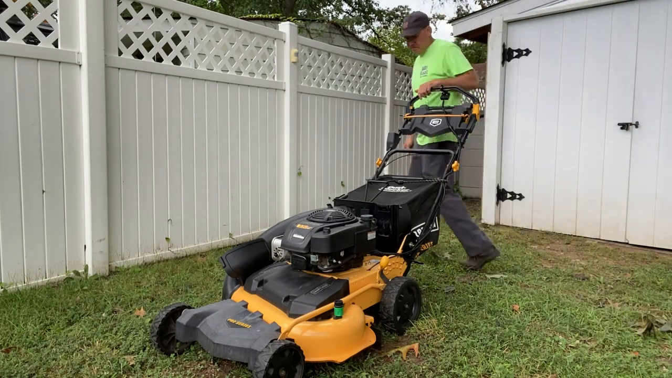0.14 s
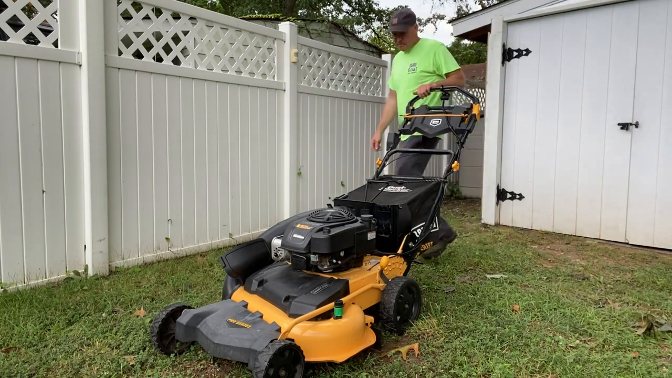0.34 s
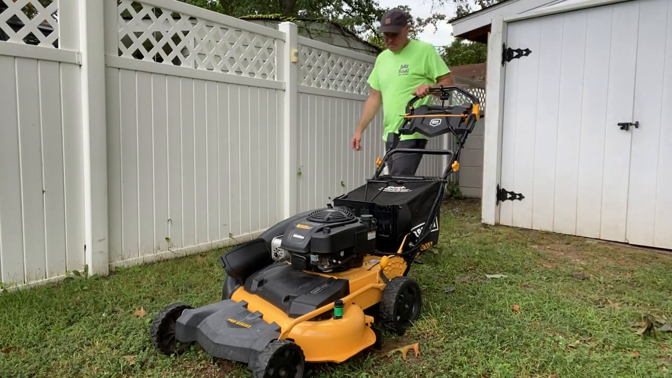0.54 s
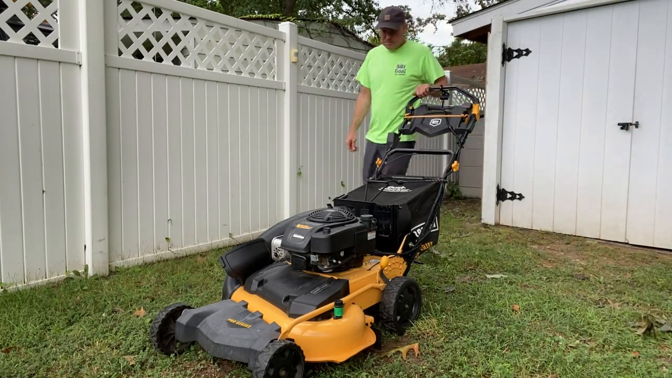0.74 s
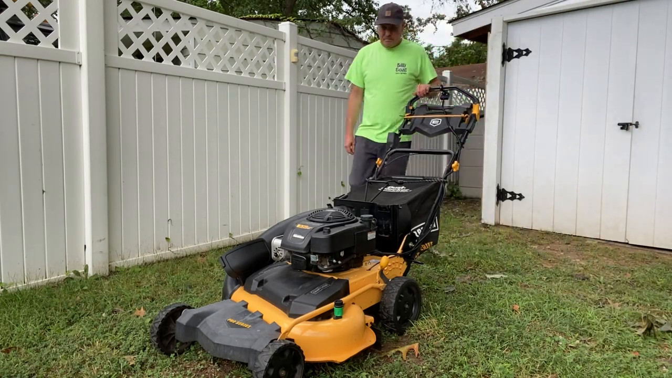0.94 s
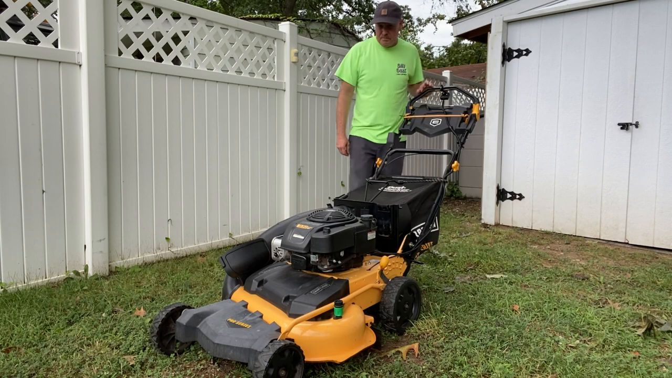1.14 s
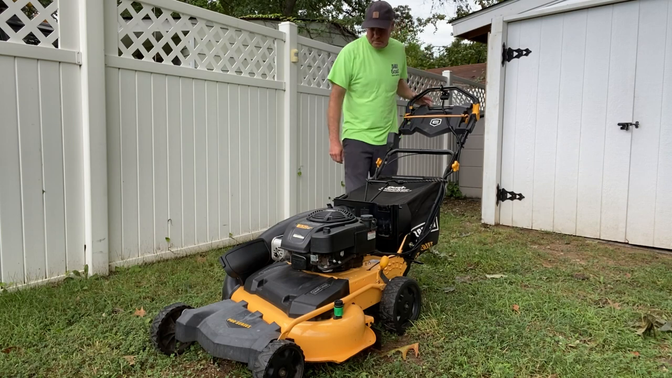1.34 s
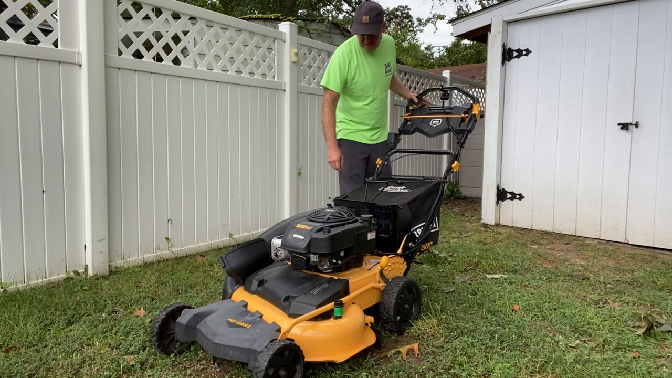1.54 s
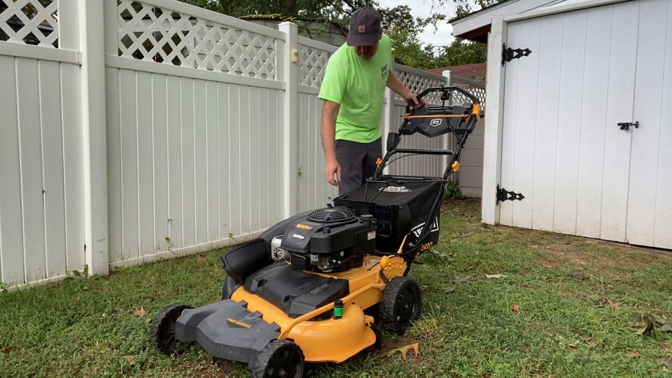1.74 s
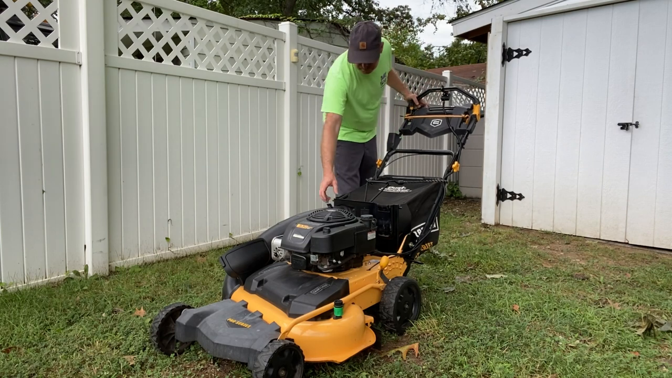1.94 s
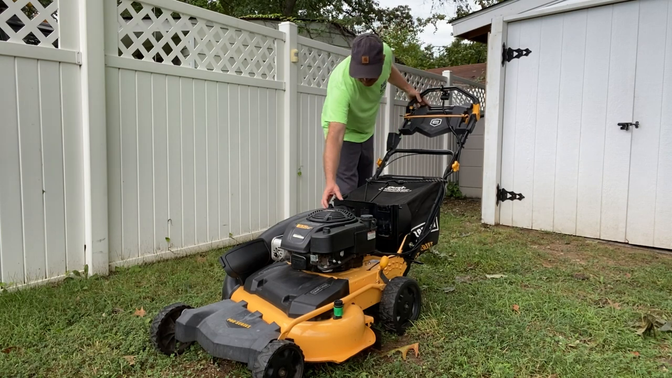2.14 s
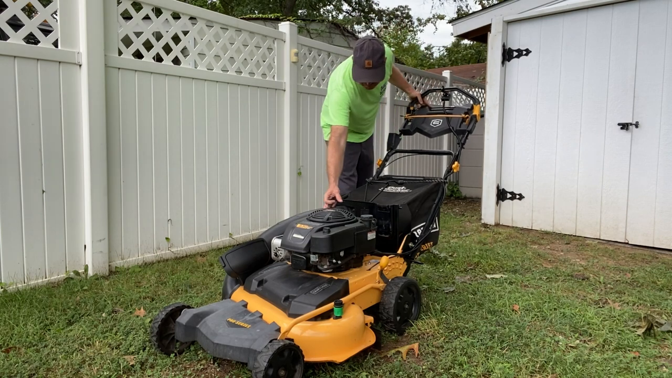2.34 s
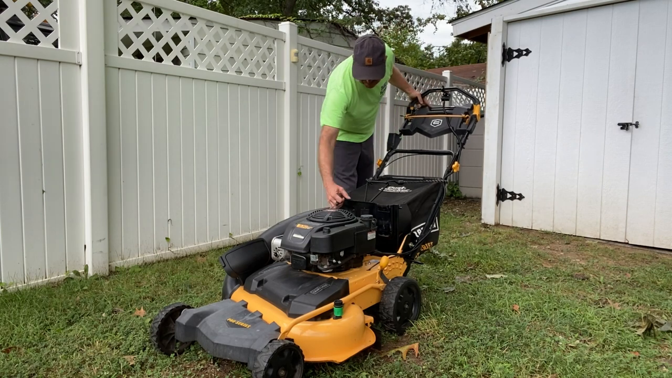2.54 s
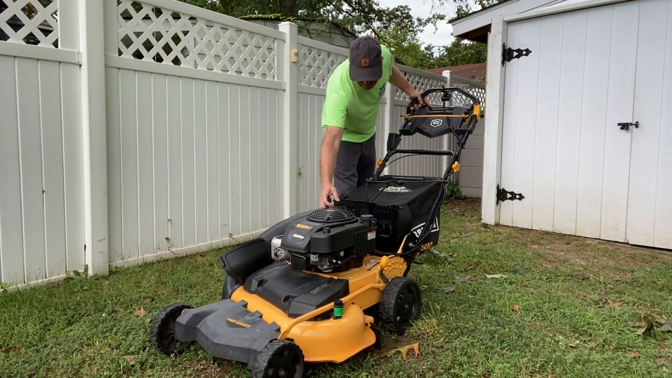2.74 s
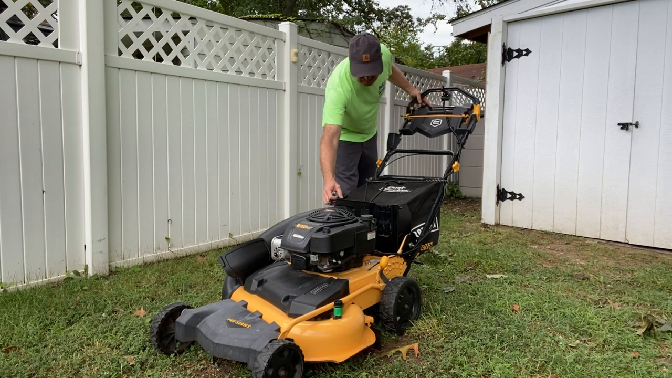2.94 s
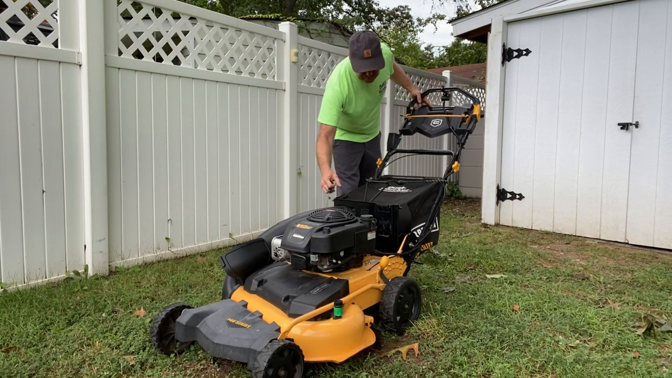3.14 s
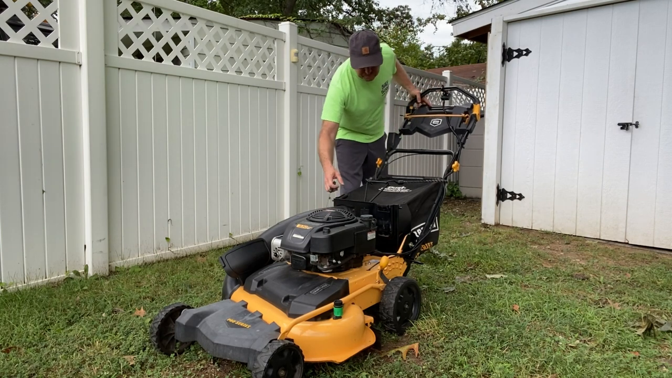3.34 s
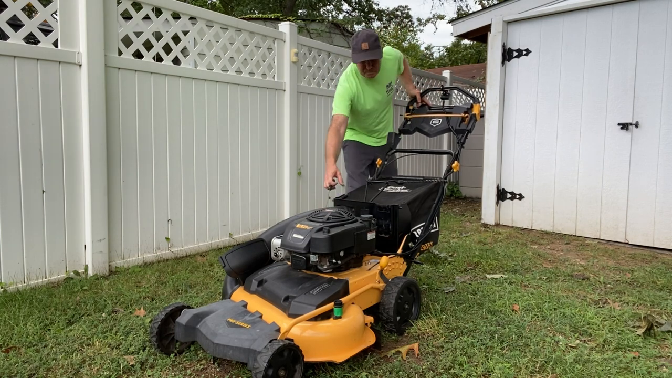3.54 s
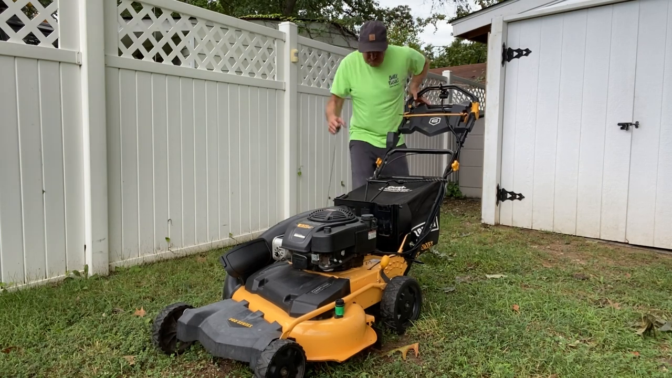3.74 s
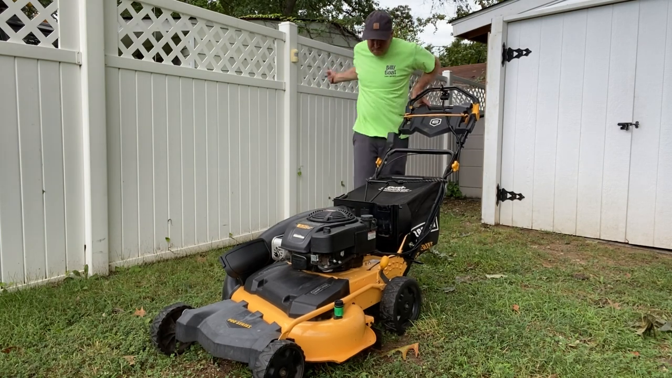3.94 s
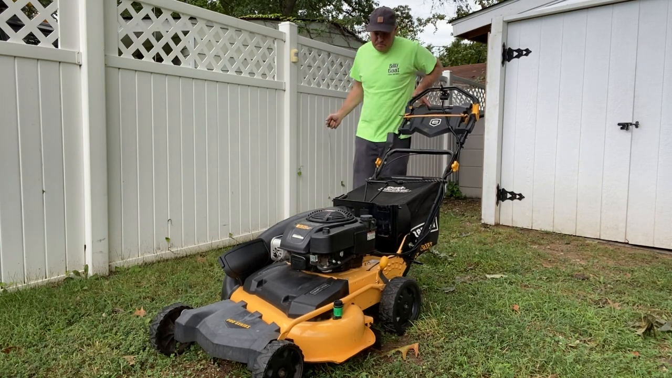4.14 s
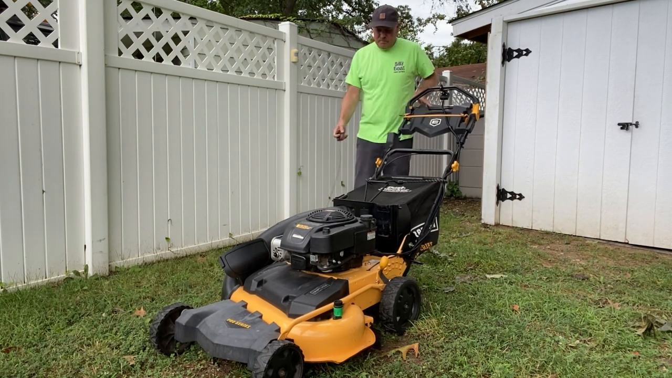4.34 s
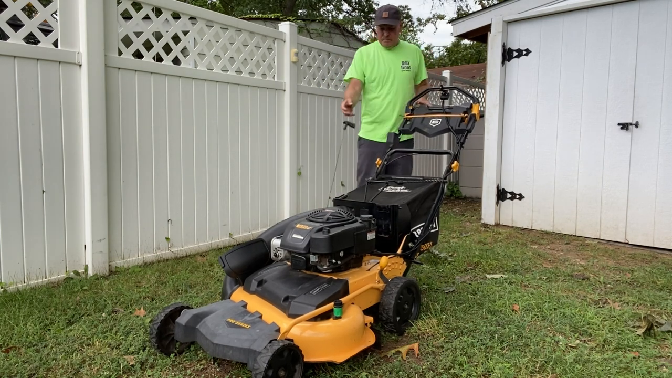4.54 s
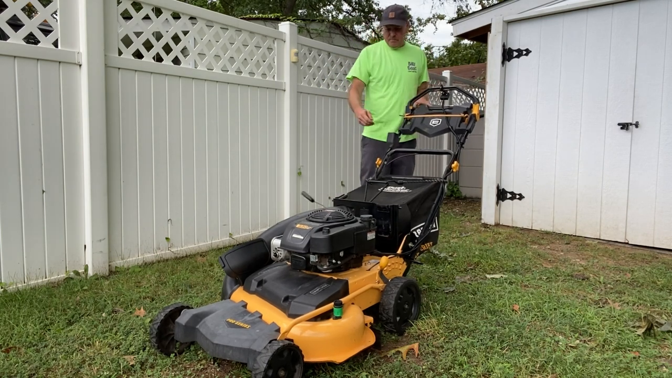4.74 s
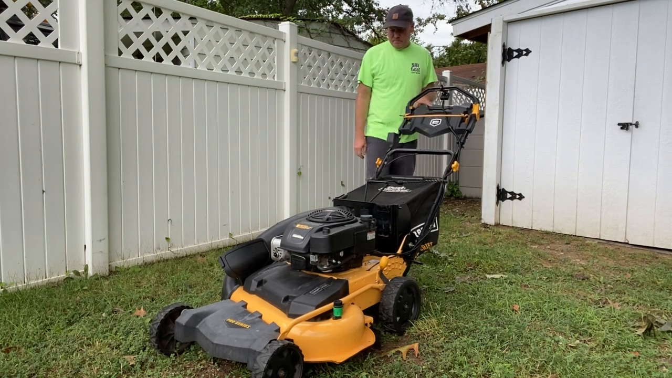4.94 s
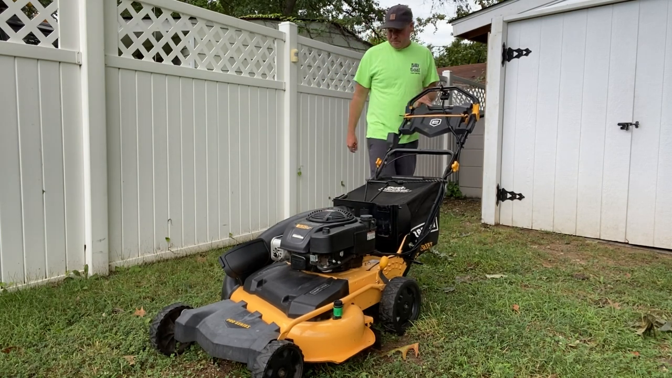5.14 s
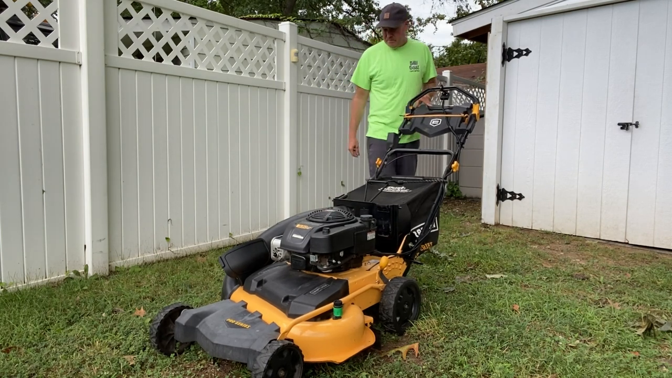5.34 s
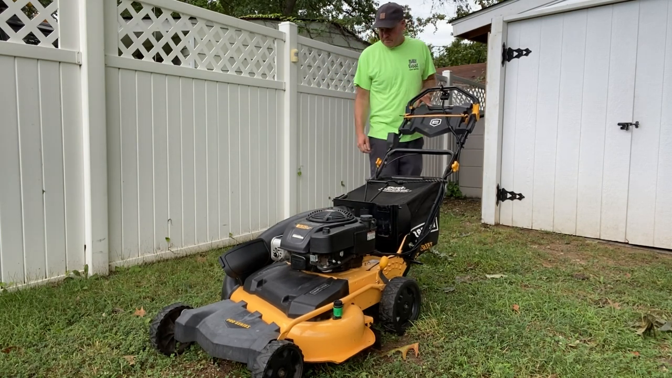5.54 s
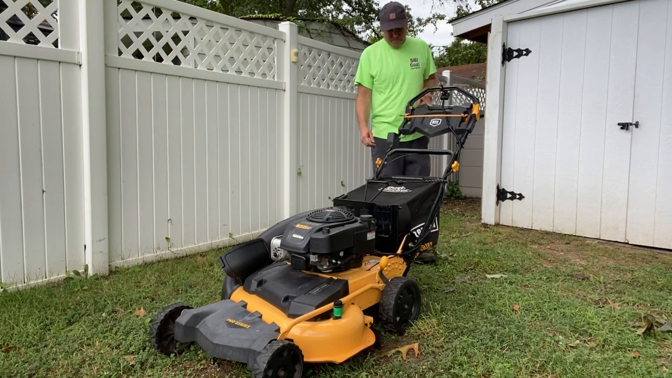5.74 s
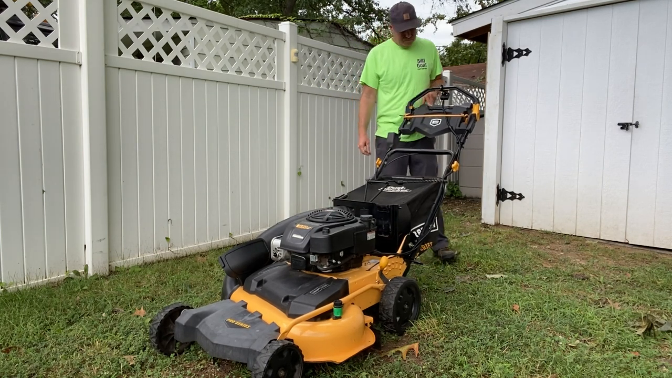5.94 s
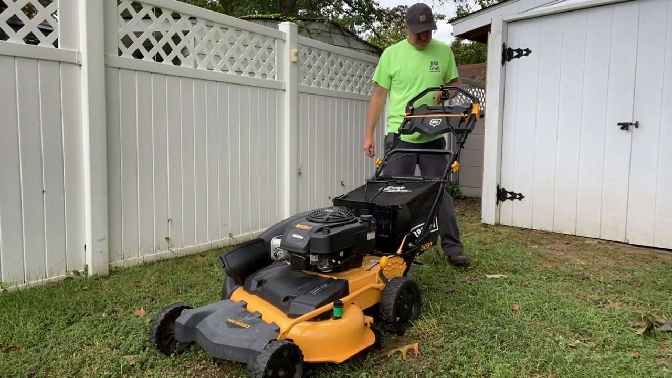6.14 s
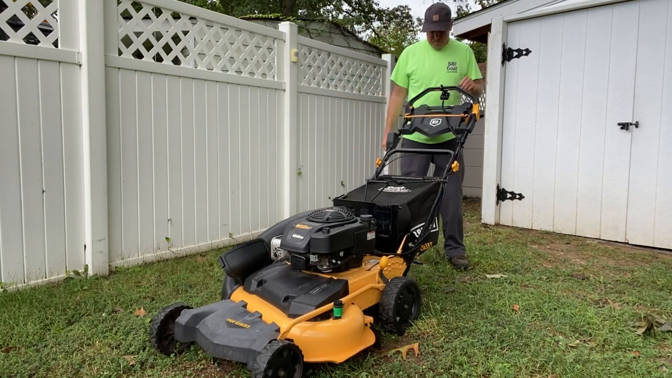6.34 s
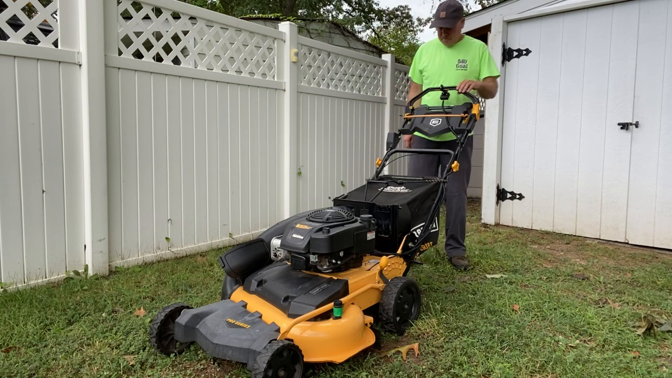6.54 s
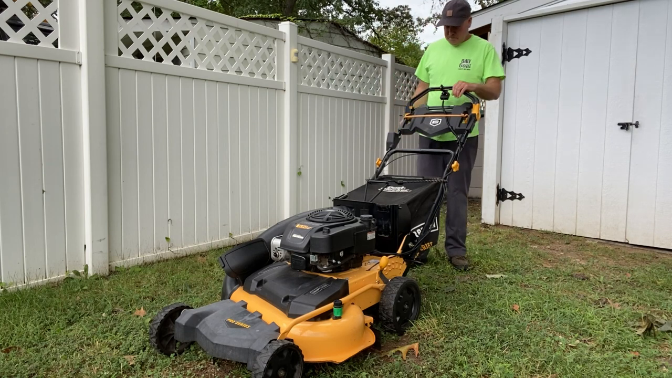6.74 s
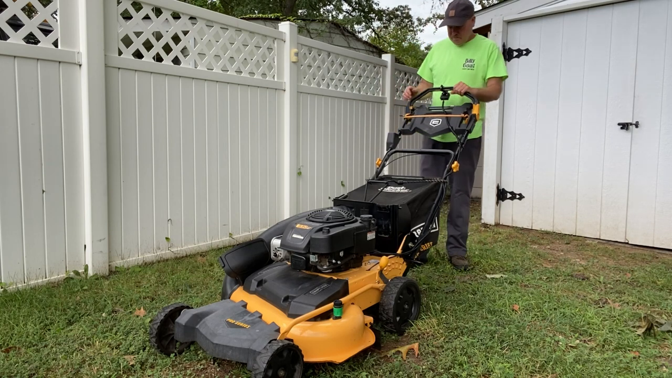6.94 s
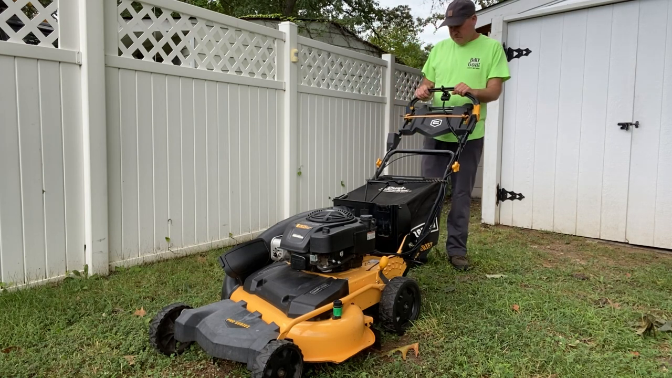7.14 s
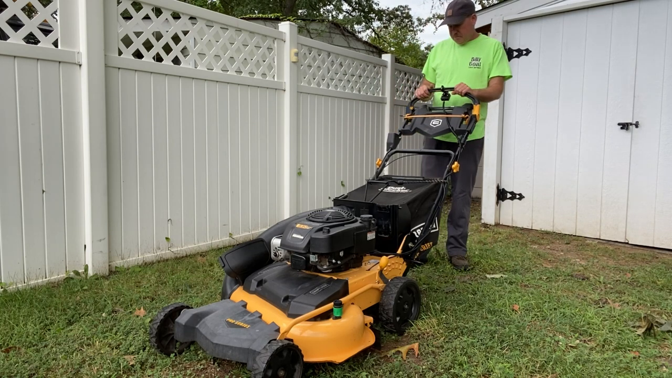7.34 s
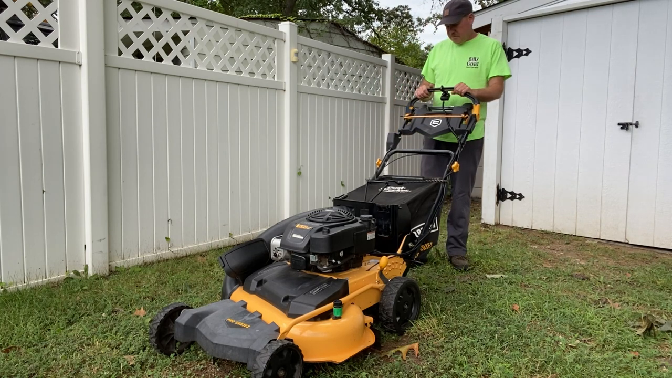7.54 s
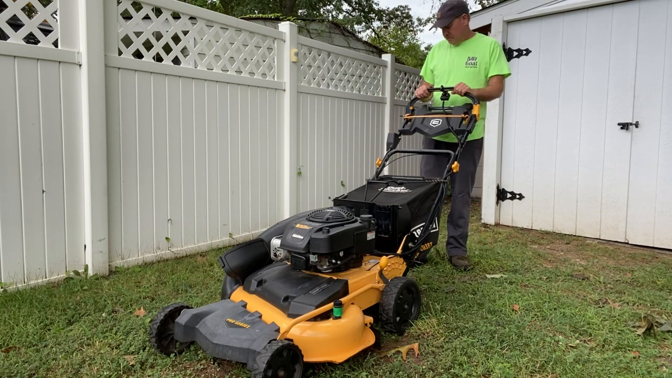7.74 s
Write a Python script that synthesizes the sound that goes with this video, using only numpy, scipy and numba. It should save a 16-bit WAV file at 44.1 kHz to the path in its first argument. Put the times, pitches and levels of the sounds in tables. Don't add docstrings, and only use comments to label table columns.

```python
import sys
import numpy as np
from scipy import signal
from scipy.fft import rfft, irfft
from scipy.io import wavfile
from scipy.ndimage import uniform_filter1d
from numba import njit

SR = 44100
rng = np.random.default_rng(int(sys.argv[2]) if len(sys.argv) > 2 else 0)


def decibels_to_gain(level_db):
    exponent = np.asarray(level_db, float) / 20
    return 10 ** exponent


def log_audio(samples):
    frames = np.atleast_2d(samples).T
    limited = np.clip(frames, -1, 1)
    pcm = np.round(limited * 32767).astype(np.int16)
    wavfile.write(sys.argv[1], SR, pcm)


N = 347508
TIME, FREQ = np.arange(N) / SR, np.maximum(np.arange(N // 2 + 1) * SR / N, 1)


def noise():
    return rng.standard_normal(N)


def curve(table, column=1, at=TIME):
    return np.interp(at, *np.array(table, float).T[[0, column]])


def level(x, db):
    return x * decibels_to_gain(db) / np.sqrt(np.mean(x ** 2))


def unit(x):
    return x / np.abs(x).max()


def delay(x, s):
    return np.roll(x, int(s * SR))


def colour(x, spectrum):
    hz, db = np.transpose(spectrum)
    return irfft(rfft(x, N) * decibels_to_gain(np.interp(np.log(FREQ), np.log(hz), db)), N)


@njit
def svf(x, hz, width):
    y, b, l = np.empty(len(x)), 0., 0.
    for i in range(len(x)):
        g, k = np.tan(np.pi * hz[i] / SR), width / hz[i]
        v = (b + g * (x[i] - l)) / (1 + g * (g + k))
        b, l, y[i] = 2 * v - b, l + 2 * g * v, k * v
    return y


def band(x, hz, width):
    return svf(x + 1e-18, hz * np.ones(N), 1. * width)


def fade(x, s):
    return signal.lfilter([1], [1, -np.exp(-1 / (s * SR))], x)


def walk(rate):
    k = int(SR / rate)
    held = np.repeat(rng.standard_normal(N // k + 1), k)
    return 0.87 * uniform_filter1d(uniform_filter1d(held, k), k)[:N]


# f/Hz, level/dB per Hz
TRAFFIC = [(15, -52), (25, -35), (39, -3.5), (70, 2.5), (96, 1), (119, -4), (252, -14), (332, -19.5),
           (856, -25.5), (2800, -37.5), (3640, -70), (6160, -120)]
# t/s, level/dB
CAR_SWELL = [(0.3, 4), (1.74, 0.5), (2.17, 4.5), (3.0, 3.5), (3.5, -1.5), (3.6, -10)]


def traffic():
    side_over_mid = [(30, -21), (150, -8.5), (300, -5), (600, 2.0), (3000, -0.5)]  # f/Hz, level/dB
    mid, side = (colour(noise(), TRAFFIC) for _ in range(2))
    both = (mid + np.array([[1], [-1]]) * colour(side, side_over_mid)) * decibels_to_gain(1.2 * walk(4.02))
    both = both * decibels_to_gain(-48.5 + np.array([[.7], [-.7]])) / np.std(mid)
    swell = decibels_to_gain(curve(CAR_SWELL) + 0.53 * walk(4.8))
    return both + [band(port, 1200, 1600) * (swell - 1) for port in both]


# f/Hz, width/Hz, level/dB, pulsing/dB
INSECT_CHOIRS = [(3180, 250, -74.5, 3.5), (3450, 580, -73.5, 6), (4230, 480, -76.5, 4.5),
                 (5780, 1260, -61.5, 1.3), (8370, 1470, -68.5, 4.5)]


def insects():
    out = np.zeros((2, N))
    for hz, width, db, pulse_db in INSECT_CHOIRS:
        for port in out:
            port += level(band(band(noise(), hz, width), hz, width), db + 3) * decibels_to_gain(pulse_db * walk(9.03))
    return out


# t/s, level/dB
GRASS_STEP = [
    (.3, -79),
    (.37, -58),
    (.45, -71),
    (.6, -88),
    (.95, -93),
]


def grass_step():
    return level(band(band(noise(), 7700, 2500), 11700, 2500), 0) * decibels_to_gain(curve(GRASS_STEP))


def struck(blows, crack_hz):
    out, t = np.zeros(N + SR), np.arange(SR // 4) / SR
    crack_band = [crack_hz / 2.6, min(crack_hz * 2.0, .45 * SR)]
    crack_filter = signal.butter(2, crack_band, "band", fs=SR)
    for s, db, hz, t60, crack_db in blows:
        rough, sharp = rng.standard_normal((2, len(t)))
        wobble = uniform_filter1d(rough, size=max(int(SR / hz), 8)) * 3.6
        ring = np.sin(2 * np.pi * hz * t + wobble) * (1 - np.exp(-t / 0.002)) * decibels_to_gain(-60 * t / t60)
        crack = signal.lfilter(*crack_filter, sharp) * np.exp(-t / 0.0082)
        out[int(s * SR):int(s * SR) + len(t)] += decibels_to_gain(db) * (ring + decibels_to_gain(crack_db) * crack)
    return out[:N]


# t/s, peak level/dB, f/Hz, t60/s, crack level/dB
HANDLE_TAGS = [
    (.687, -33, 11000, 0.13, -14),
    (0.76, -46, 11700, 0.1, -20),
    (.69, -50, 14000, .08, -16),
    (0.64, -54, 8000, .06, -20),
    (.772, -56, 12700, .06, -18),
]


def tags():
    return colour(struck(HANDLE_TAGS, 11000), [(5000, -30), (7500, -5.5)])


# start t/s, end t/s, start f/Hz, end f/Hz, level/dB
THIN_SQUEAKS = [
    (2.182, 2.383, 3340, 3270, -55),
    (2.36, 2.5, 4700, 4700, -73),
    (2.6, 2.83, 2500, 2500, -50.5),
    (2.626, 2.717, 4100, 4050, -60),
    (3.4, 3.55, 3240, 3270, -64),
    (3.617, 3.71, 900, 2070, -42),
    (3.698, 3.8, 2060, 3450, -42),
    (1.098, 1.75, 3140, 3100, -70),
    (3.644, 3.76, 2950, 5140, -58),
]


def squeaks():
    out = np.zeros(N)
    for start, end, hz, end_hz, db in THIN_SQUEAKS:
        gone = np.clip((TIME - start) / (end - start), 0, 1)
        shake_hz = 7 + .04 * abs(end_hz - hz)
        loudness = np.sin(np.pi * gone) * decibels_to_gain(db + (2.5 + .1 * shake_hz) * walk(60))
        pitch = hz + (end_hz - hz) * gone + shake_hz * walk(70)
        out += loudness * np.sin(2 * np.pi * np.cumsum(pitch) / SR)
    return out


# start t/s, end t/s, level/dB, treble level/dB
HAND_STROKES = [
    (2.187, 2.372, -56, -16),
    (2.51, 2.562, -44.5, -11),
    (2.57, 2.752, -51, 2),
    (2.75, 2.787, -52, -30),
    (2.877, 2.876, -49.5, -26),
    (2.96, 3.075, -48.5, -9),
    (3.095, 3.105, -38.5, -2),
]
# t/s, level/dB, treble level/dB
CORD_PULL = [
    (3.5, -62, 8),
    (3.646, -51, -9),
    (3.72, -37, -5),
    (3.74, -29.5, -29),
    (3.752, -34, -9),
    (3.796, -38.5, 7),
    (3.83, -15.5, -7),
]


def sliding():
    rise_db_s, fall_db_s = 400, 330
    grain = noise() * decibels_to_gain(3.3 * walk(120))
    dull = level(band(grain, 820, 760), -3.5) + level(band(grain, 1510, 110), -13.5)
    bright = level(band(band(grain, 3300, 5600), 2700, 4800), -9.0)
    pulling = (TIME > CORD_PULL[0][0]) * (TIME < CORD_PULL[-1][0])
    out = pulling * decibels_to_gain(curve(CORD_PULL)) * (dull + decibels_to_gain(curve(CORD_PULL, column=2)) * bright)
    for start, end, db, treble_db in HAND_STROKES:
        away_db = rise_db_s * np.maximum(start - TIME, 0) + fall_db_s * np.maximum(TIME - end, 0)
        out += decibels_to_gain(db - away_db) * (dull + decibels_to_gain(treble_db) * bright)
    return out


# t/s, peak level/dB, f/Hz, crack level/dB
GRIP_KNOCKS = [(2.259, -37, 2370, -20), (2.333, -37, 884, -20), (2.51, -50, 1560, -8),
               (2.546, -36, 1550, 2), (2.58, -40, 1580, 4), (2.658, -33, 1110, -6), (2.729, -30, 1700, -17),
               (2.868, -33.5, 828, -18), (2.94, -39.5, 450, -3), (3.007, -31.5, 1570, -9),
               (3.057, -37, 1560, 7.5), (3.083, -33, 1560, 5), (3.091, -22.5, 311, -23),
               (3.553, -35, 3280, -5), (3.583, -41, 950, -2), (3.633, -30, 990, -20),
               (3.673, -32.5, 1005, -2), (3.72, -27, 293, -14), (3.737, -19, 281, -20),
               (3.773, -23, 201, -18), (4.718, -11.5, 720, 4), (4.718, -24, 1530, -29)]
# f/Hz, level/dB, t60/s
COVER_MODES = [(424, -30.5, 0.11), (650, -27.5, 0.11), (900, -12.5, 0.028), (1100, -27, .081),
               (1464, -21.5, 0.05)]


def knocks():
    t60_at_1k, slope = 0.065, 0.61
    blows = [(s, db, hz, t60_at_1k * (1000 / hz) ** slope, crack_db) for s, db, hz, crack_db in GRIP_KNOCKS]
    blows += [(2.765, db, hz, t60, -32) for hz, db, t60 in COVER_MODES]
    return struck(blows, 2800)


def handling():
    plastic = squeaks() + sliding() + knocks()
    return grass_step() + tags() + colour(plastic, [(8000, -2.5), (11000, -5)])


def cyclic(since):
    repeat_share = 0.39
    again = colour(noise()[(since * SR).astype(int)], [(450, -30), (800, 0)])
    return np.sqrt(repeat_share) * again + np.sqrt(1 - repeat_share) * noise()


# f/Hz, level/dB per Hz
WHIRR_COLOUR = [(60, -10), (150, -11), (380, -9.5), (560, -10.5), (1200, -14), (1900, -23), (4000, -28.5),
                (8800, -39), (10500, -51), (13000, -68), (16000, -90)]


def whirr(since, spin):
    return level(colour(cyclic(since), WHIRR_COLOUR), 0) * spin * decibels_to_gain(4.5 + 0.71 * walk(25))


# f/Hz, width/Hz, level/dB
HOUSING_MODES = [(925, 9.5, -6), (1045, 26, 1), (1119, 14.5, 5.5), (1206, 95, 5), (1450, 410, 5.5)]


def covers(clack, spin, since):
    rattle = spin * (0.87 + 3.8 * unit(fade(fade(clack, 0.012), 0.011))) * cyclic(since)
    shake = fade(fade(rattle + 8 * spin * clack, .00008), .00008)
    return sum(decibels_to_gain(db) * band(shake, hz, width) / np.sqrt(width) for hz, width, db in HOUSING_MODES)


# firing number, lateness/ms
GOVERNOR_HUNT = [(5, 0), (7, 3), (10, .6), (16, -2.1), (20, 2.7), (24, 1.4), (32, 4), (36, 2.8), (44, 2.6),
                 (52, 1), (60, 3.3), (68, -1), (72, -.4), (88, -2.8), (100, -.3)]
# t/s, spit level/dB
THROTTLE_LEVEL = [(3.82, -7), (4.0, -9), (4.15, -10.5), (4.22, -10), (4.3, -11.5), (4.75, -14), (4.9, -16),
                  (5.28, -15), (5.4, -18), (5.8, -17.5), (5.95, -21), (6.15, -16.5), (6.5, -21), (7.0, -22),
                  (7.4, -20.5), (7.52, -16.5), (7.68, -21.5), (7.83, -16.5)]
# start t/s, end t/s, share of the burn lost
MISSED = [
    (4.36, 4.43, 1.2),
    (4.435, 4.51, 1.08),
    (4.515, 4.545, 0.67),
    (4.78, 4.81, 0.12),
    (4.93, 4.96, 0.2),
    (4.965, 4.995, 0.25),
    (5.0, 5.03, 0.93),
    (5.825, 5.855, 0.32),
    (7.1, 7.13, 0.05),
    (7.17, 7.2, 0.067),
]


def burn():
    catch_s, cycle_s, runup_lag_s, runup_ratio = 3.8206, .0375, .1434, .66
    warm_s, warm_width_s, miss_chill = 4.2, 0.08, 0.96
    n = np.arange(105)
    fired = catch_s + n * cycle_s + runup_lag_s * (1 - runup_ratio ** n) + curve(GOVERNOR_HUNT, at=n) / 1000
    lost = sum(share * ((fired > start) & (fired < end)) for start, end, share in MISSED)
    throttle_db = curve(THROTTLE_LEVEL, at=fired)
    thump_db = -15.5 + 0.18 * (throttle_db + 18) - 7.5 * lost
    spit_db = throttle_db - 13.5 * lost
    warming = 1 / (1 + np.exp((fired - warm_s) / warm_width_s))
    lingering = 0.1 * signal.lfilter([0, 1], [1, -0.79], lost)
    cold = np.clip(warming + miss_chill * lost + lingering, 0, 1)
    return fired, thump_db, spit_db, cold


# multiple of the cycle, level/dB over whirr, lead/turns
PISTON_PUMP = [(2, 2.5, -0.47), (3, 3, -0.06), (4, -6, 0.55), (14, -10.5, 0.65)]


def pump(fired, spin):
    turns = np.interp(TIME, fired, np.arange(len(fired)))
    tones = sum(decibels_to_gain(db) * np.sin(2 * np.pi * (k * turns + lead)) for k, db, lead in PISTON_PUMP)
    return spin * (TIME > fired[0]) * tones


# f/Hz, width/Hz, signed gain
MUFFLER_CHAMBERS = [(108, 10, .6), (142.5, 32, -7.1), (157.3, 45, 6.7), (228, 10, .8), (297.5, 10, -.3),
                    (390, 21, -1.0)]
# f/Hz, width/Hz, level/dB
MUFFLER_BOOM = [(87.7, 11.7, 2), (162, 69, 1)]


def muffler(push, cold):
    cold_speed, boom_hot_db, boom_cold_db = 0.89, -15.5, -4
    heat = 1 - (1 - cold_speed) * cold
    boom = decibels_to_gain(boom_hot_db + (boom_cold_db - boom_hot_db) * cold)
    out = np.zeros(N)
    for hz, width, gain in MUFFLER_CHAMBERS:
        out += gain * band(push * heat ** (hz / 45), hz * heat, width) / width
    for hz, width, db in MUFFLER_BOOM:
        out += decibels_to_gain(db) * band(push * boom, hz * heat, width) / width
    return out


def chuff(push, cold, since):
    falling_hz = 70 + 115 * np.exp(-since / .012)
    out = delay(push, .0015) * cold ** 1.1
    for _ in range(3):
        out = band(out, falling_hz, 78)
    return out


# f/Hz, level/dB per Hz
SPIT_COLOUR = [(300, 0), (1500, -24), (2500, -9.5), (4200, -4), (6500, 2.5), (8500, 7.5), (11000, 2.5),
               (13500, -8), (16000, -27)]
# f/Hz, width/Hz, level/dB
HOLE_WHISTLES = [(2500, 490, -16), (4230, 240, -4), (5200, 790, 2.5), (6324, 250, 2.5), (7430, 310, -6.5),
                 (13760, 1200, -3.5)]
# f/Hz, level/dB
FENCE_WAKE = [(500, -22), (2000, 14.5), (4200, 9.5), (8500, -6), (11000, -4), (16000, -20)]


def gas_spit(jet, spit):
    hiss = level(colour(noise() * decibels_to_gain(3.5 * walk(900)), SPIT_COLOUR), 0)
    holes = np.zeros(N)
    for hz, width, db in HOLE_WHISTLES:
        holes += decibels_to_gain(db + 4.4 * walk(35)) * band(jet * noise(), hz, width) / np.sqrt(width)
    bright = decibels_to_gain(13) * band(hiss * jet ** 2.88, 12200, 6900)
    gas = hiss * jet + bright + level(holes, -1.1) * np.std(jet)
    wake = decibels_to_gain(-9.0) * delay(jet, 0.0072)
    wake += decibels_to_gain(-9) * unit(fade(spit, 0.0077)) + decibels_to_gain(-19) * unit(fade(spit, 0.033))
    return gas + colour(hiss[::-1], FENCE_WAKE) * wake


def intake_honk(clack, spin):
    return band(band(delay(clack, 0.004865) * spin, 1047, 100), 1047, 100)


def muffler_shell(jet):
    blow = fade(fade(noise() * jet, .00008), .00008)
    modes = [(1218.5, 24, -37), (1493, 170, -39.5), (2186, 270, -46)]  # f/Hz, width/Hz, level/dB
    return sum(level(band(blow, hz, width), db) for hz, width, db in modes)


# t/s, whirr level/dB
SPIN_LEVEL = [
    (3.5, -67),
    (3.68, -50.5),
    (3.93, -31),
    (4.0, -41),
    (4.24, -38),
    (4.45, -34.5),
    (4.89, -33),
    (7.88, -33),
]


def engine():
    fired, thump_db, spit_db, cold = burn()
    index = (fired * SR).astype(int)
    chance = rng.standard_normal((3, len(fired)))
    thump, spit, clack = np.zeros((3, N))
    thump[index] = decibels_to_gain(thump_db + 0.28 * chance[0])
    spit[index] = decibels_to_gain(spit_db + 1.7 * chance[1])
    clack[index - int(.012 * SR)] = decibels_to_gain(2.0 * chance[2])
    cold, spin = np.interp(TIME, fired, cold), decibels_to_gain(curve(SPIN_LEVEL))
    last_fired = fired[np.maximum(np.searchsorted(fired, TIME) - 1, 0)]
    since = np.maximum(TIME - last_fired, 0) + (TIME < fired[0]) * TIME
    push = delay(fade(fade(thump, .0005), .0005), .0004)
    jet = unit(fade(fade(spit, 0.00072), 0.0024))

    point = whirr(since, spin) + pump(fired, spin) + muffler_shell(jet)
    point += level(covers(clack, spin, since), -31.5)
    point += level(intake_honk(clack, spin), -38.5)
    point += level(muffler(push, cold), -22.5)
    point += level(chuff(push, cold, since), -27.5)
    point += level(gas_spit(jet, spit), -27.5)
    return point * (TIME > SPIN_LEVEL[0][0]), decibels_to_gain(-7) * whirr(since, spin)


# f/Hz, level/dB
FENCE_SHARE = [(30, -20), (200, -28), (500, -5), (1100, -15.5), (2500, -7), (6000, -8), (16000, -53)]


def fence(near):
    t = np.arange(int(.12 * SR)) / SR
    tail = rng.standard_normal(len(t)) * np.exp(-t / 0.013) * (t > .002)
    return signal.fftconvolve(colour(near, FENCE_SHARE), tail / np.linalg.norm(tail))[:N]


# f/Hz, left lead/rad
PORT_LEAD = [(0, 0), (690, -0.3), (1550, -0.1), (4740, -0.0), (5430, 0.8), (6120, -0.9), (7060, -0.8),
             (8350, 0.2), (9910, 2.9), (11300, 3.4), (12100, 5.9), (13700, 6.5), (14600, 9.3), (16100, 9.5)]
# f/Hz, left minus right level/dB
PORT_LEVEL = [(60, 2.0), (110, 1.5), (200, 2.0), (380, 3.0), (700, -1.0), (1290, 0.5), (2380, -1.0),
              (4400, 0.0), (8120, -0.5), (15000, 0.0)]


def scene():
    point, wide = engine()
    near = point + handling()
    half = np.exp(.5j * curve(PORT_LEAD, at=FREQ)) * decibels_to_gain(curve(PORT_LEVEL, at=FREQ) / 2)
    direct = np.array([irfft(rfft(near) * h, N) for h in (half, 1 / half)])
    sides = (fence(near) + wide) * np.array([[1], [-1]])
    quiet_start = np.clip(TIME * 10 - .5, 0, 1)
    return (direct + sides) * quiet_start + traffic() + insects()


def low_pass(x):
    return signal.sosfilt(signal.butter(12, 16500, fs=SR, output="sos"), x)


def record(dry):
    bass_cut = signal.butter(4, 42, "high", fs=SR, output="sos")
    mix = 0.68 * np.tanh(signal.sosfilt(bass_cut, dry) / 0.68)
    return low_pass(mix)


dry = scene()
out = record(dry)
log_audio(out)
```